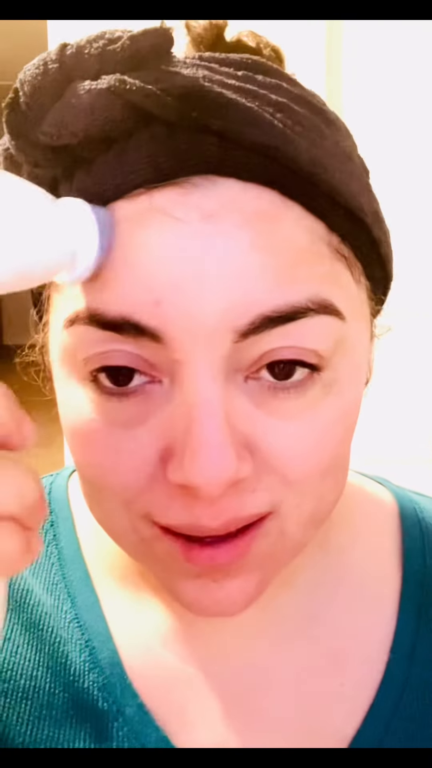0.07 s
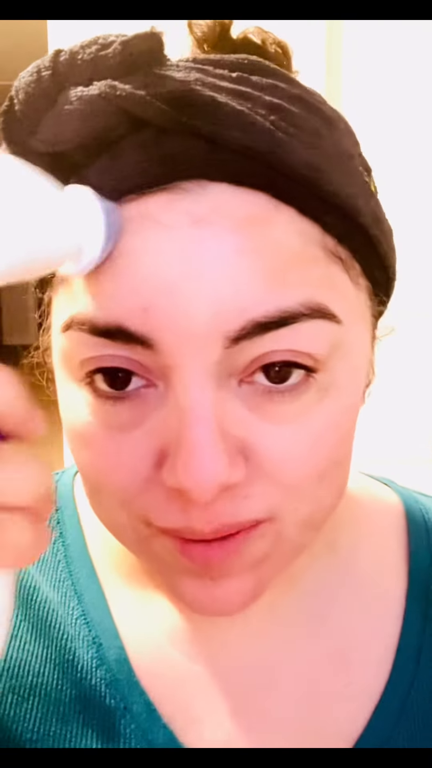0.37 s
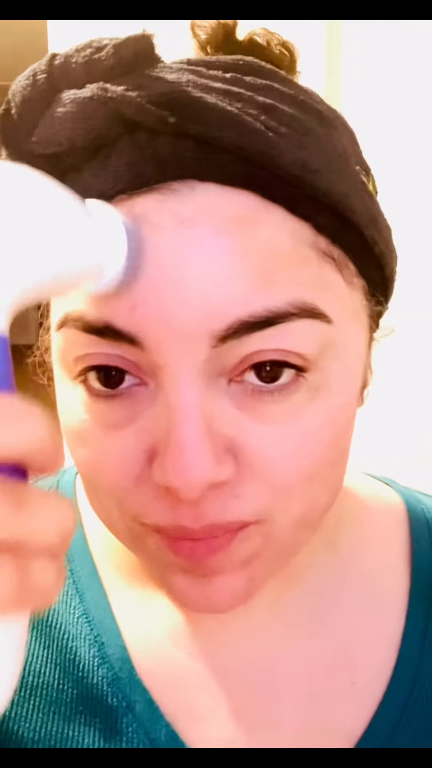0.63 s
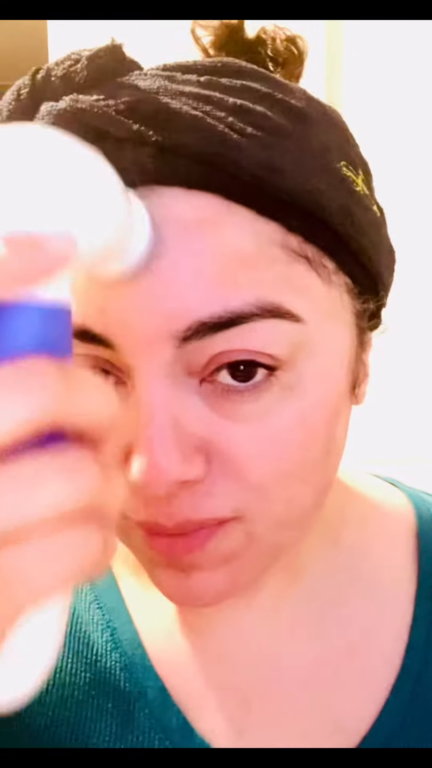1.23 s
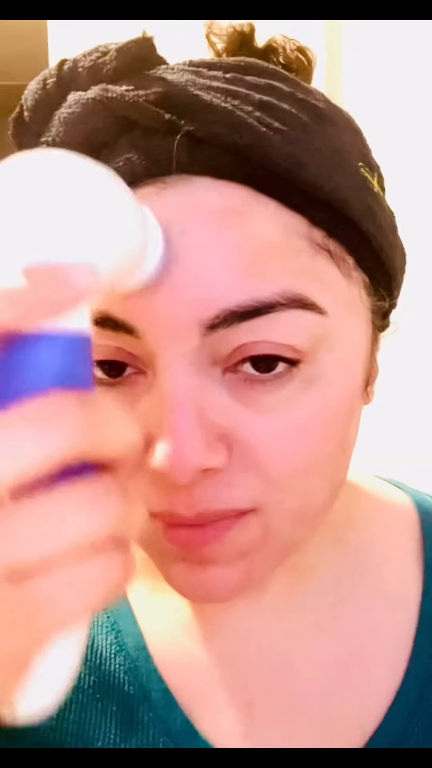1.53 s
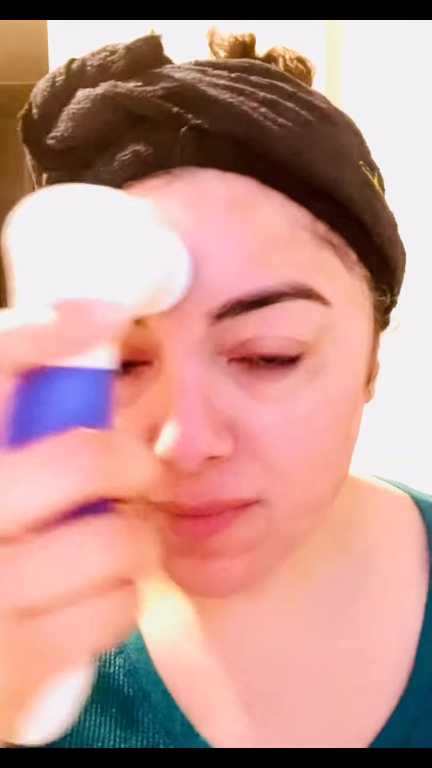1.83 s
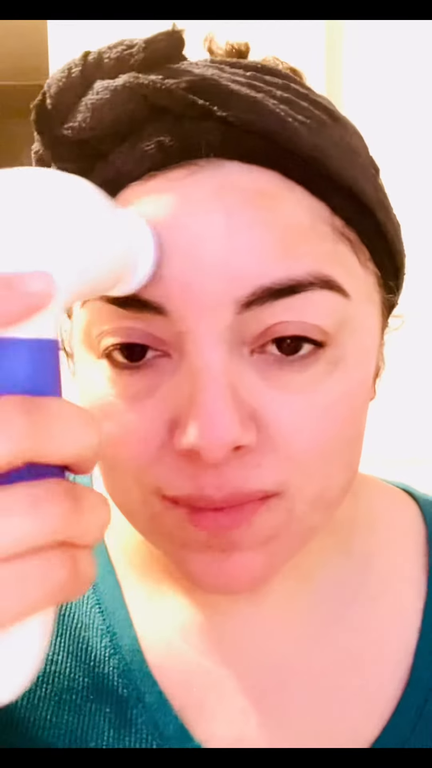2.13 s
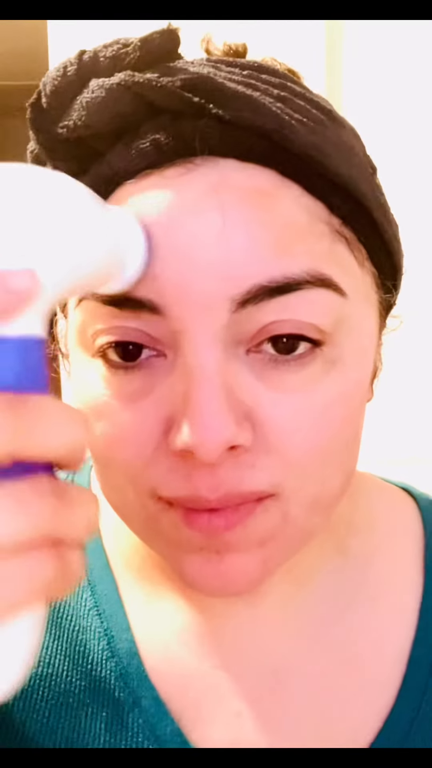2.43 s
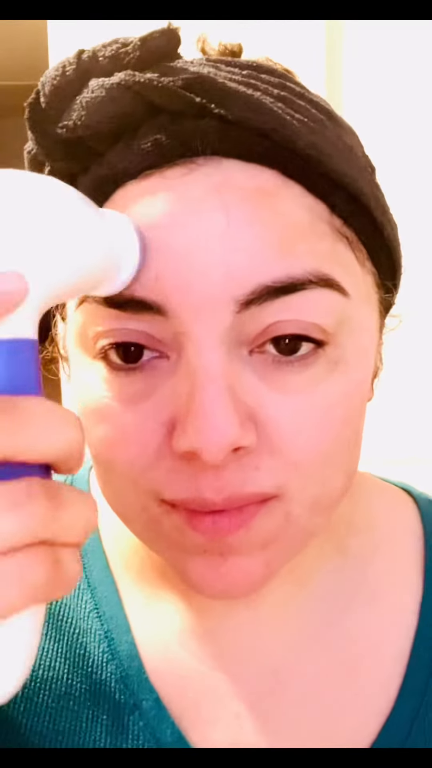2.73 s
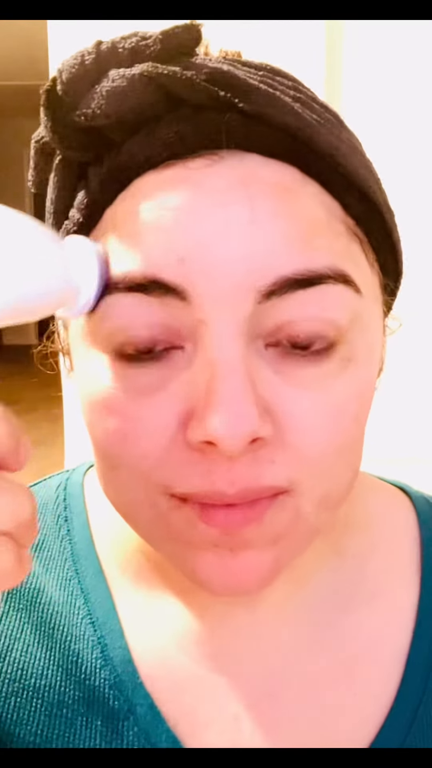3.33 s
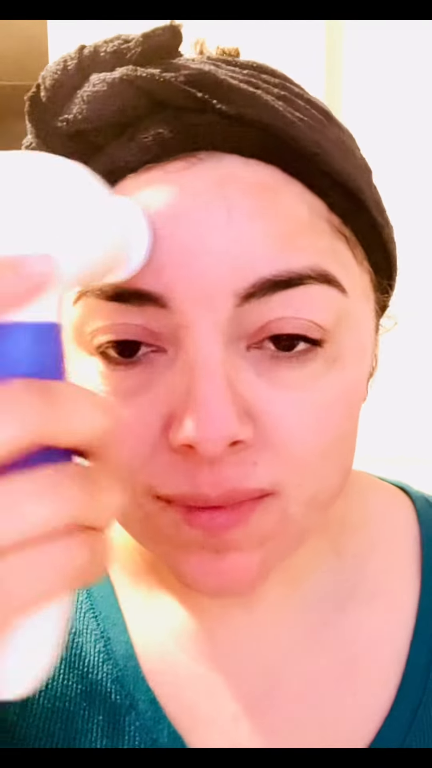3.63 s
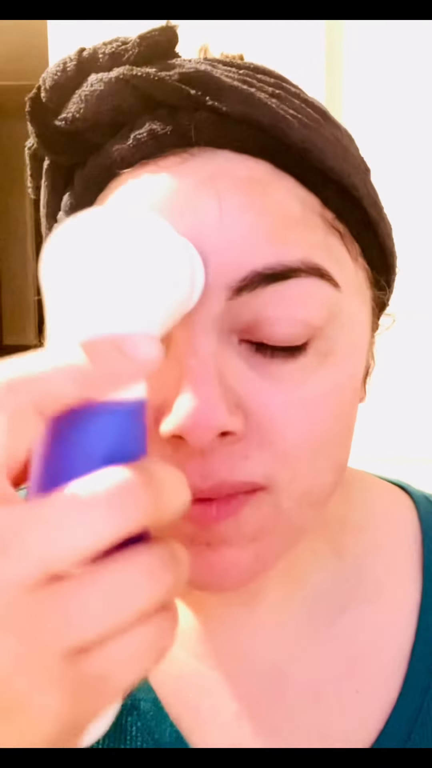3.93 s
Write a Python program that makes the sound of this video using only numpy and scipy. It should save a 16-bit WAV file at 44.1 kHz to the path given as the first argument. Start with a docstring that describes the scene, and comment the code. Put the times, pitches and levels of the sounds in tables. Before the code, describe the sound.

A small battery facial massager buzzes without a break, close to the microphone in a quiet room. Its high whine wavers slightly and swells and fades over a fine plastic rattle and hiss.

```python
"""A quiet room, close to a stereo microphone: a small battery facial massager buzzes over a forehead.
Its motor drives a wheel through a pinion: the teeth whine and rattle in the plastic housing, and the
brushes hiss once a turn. Pressure on the skin drags the speed down, and the whine swells and fades
as the hand turns. Underneath lie a soft rub of skin and the faint hum of the room."""
import sys
import numpy as np
from scipy import signal
from scipy.fft import rfft, irfft, next_fast_len
from scipy.io import wavfile
from scipy.ndimage import uniform_filter1d, map_coordinates

SR = 44100
rng = np.random.default_rng(int(sys.argv[2]) if len(sys.argv) > 2 else 0)


def wrap_up_sound(samples):
    """Save the sound to the file named by the first command line argument, as 16-bit audio."""
    columns = np.atleast_2d(samples).T
    # keep every value between -1 and 1, then stretch to whole-number steps
    tamed = np.clip(columns, -1, 1)
    steps = np.round(tamed * 32767).astype(np.int16)
    wavfile.write(sys.argv[1], SR, steps)


N = 176400

# The motor sagging under pressure. Each row: time in seconds, turns per second.
MOTOR_SPEED = [(0.0, 123.0), (0.06, 121.9), (0.18, 125.6), (0.36, 123.8), (0.42, 120.9), (0.6, 124.9),
               (0.68, 122.1), (0.76, 123.7), (0.84, 121.9), (0.88, 123.5), (1.1, 119.9), (1.16, 123.0),
               (1.24, 122.7), (1.32, 118.8), (1.38, 119.4), (1.46, 123.2), (1.52, 123.8), (1.74, 119.4),
               (1.82, 122.9), (1.94, 121.3), (2.02, 122.2), (2.18, 122.3), (2.26, 120.7), (2.34, 123.8),
               (2.46, 121.4), (2.68, 122.6), (2.78, 119.8), (2.86, 122.8), (2.94, 120.1), (3.02, 120.6),
               (3.06, 122.8), (3.34, 126.3), (3.58, 124.6), (3.68, 121.4), (3.76, 122.8), (3.99, 122.5)]
def massager():
    """Every part of the drive follows one motor shaft, so all the pitches bend together."""
    speed, = curves(MOTOR_SPEED)
    angle = 2 * np.pi * np.cumsum(uniform_filter1d(speed, size=1500)) / SR
    noise = ride_noise(rattle(angle) + brushes(angle))
    return noise + whine(angle) + motor_hum(angle) + shaft_tones(angle) + rasp(angle)


# Fader rides for the whines at 2, 3 and 4 times the tooth rate.
# Each row: time in seconds, level in dB before the trim.
LOW_WHINE_RIDE = [(0.02, -44), (.08, -50.5), (.14, -37.5), (.22, -43), (.35, -39), (.42, -49), (.56, -38),
                  (.67, -41.5), (.75, -43), (.82, -46.5), (.88, -40.5), (.97, -49), (1.03, -44),
                  (1.09, -46), (1.2, -45), (1.33, -52.5), (1.39, -45), (1.53, -42.5), (1.65, -49.5),
                  (1.92, -46.5), (1.99, -42.5), (2.06, -47.5), (2.14, -42), (2.27, -47.5), (2.35, -40),
                  (2.41, -45.5), (2.7, -44.5), (2.78, -61), (2.85, -46), (2.94, -58), (3.18, -47),
                  (3.22, -50.5), (3.26, -46.5), (3.34, -49.5), (3.38, -53), (3.52, -40.5), (3.6, -38.5),
                  (3.65, -48.5), (3.7, -43.5), (3.94, -44), (3.99, -52)]
HIGH_WHINE_RIDE = [(0.0, -38), (.1, -39), (.21, -48.5), (.36, -37), (.43, -43), (.51, -39.5), (.56, -47.5),
                   (.63, -40), (.8, -44), (.85, -47.5), (.92, -42.5), (1.11, -50.5), (1.2, -41.5),
                   (1.29, -47.5), (1.38, -45.5), (1.44, -51), (1.52, -44), (1.65, -51.5), (1.73, -44),
                   (1.86, -58), (2.0, -42), (2.08, -44), (2.36, -43), (2.6, -42), (2.98, -42.5),
                   (3.03, -49), (3.1, -41), (3.25, -51), (3.38, -76), (3.46, -47), (3.58, -39.5),
                   (3.78, -51), (3.99, -51.5)]
WHISTLE_RIDE = [(.2, -70), (.4, -57), (.6, -70), (1.3, -72), (1.48, -60.5), (1.85, -64), (2.05, -70),
                (2.75, -67), (2.95, -58), (3.1, -63), (3.3, -74), (3.85, -60)]
# The turning shell beams the high whine unevenly.
# Each row: time in seconds, left gain in dB, left lag in radians.
WHINE_BEAM = [(0, -2, -0.082), (.55, -0.5, 0.29), (.92, 0, 1), (1.08, 0, 1), (1.55, 0.5, 0.63),
              (2.05, 1.5, -0.42), (2.22, 0, -0.54), (2.36, 2, 0.16), (2.5, 0, -0.54), (2.85, -1, -0.46),
              (3.05, -14, 0.1), (3.55, -5, -0.026), (3.72, 3, -0.64), (3.9, 7.5, 0.67)]
WHINE_TRIM_DB, FLUTTER_DB, THROB_DEPTH = 1.52, 1.1, 0.47
PINION_TEETH, WHEEL_TEETH = 11, 27
def whine(angle):
    """Tooth-rate overtones sit on shell resonances; the off-centre pinion makes the top two throb."""
    low, high, thin = (amp(curves(ride)[0] + WHINE_TRIM_DB + FLUTTER_DB * wobble(45))
                       for ride in (LOW_WHINE_RIDE, HIGH_WHINE_RIDE, WHISTLE_RIDE))
    mesh = PINION_TEETH * angle + .02 * wobble(60)
    throb = 1 + THROB_DEPTH * np.cos(angle)
    left_db, left_lag = curves(WHINE_BEAM)
    beamed = np.array([amp(left_db) * np.cos(3 * mesh - left_lag), np.cos(3 * mesh)])
    whistle = np.cos(4 * mesh + .9 * wobble(200))  # phase jitter makes it husky
    return np.sqrt(2) * (low * np.cos(2 * mesh) + throb * (high * beamed + thin * whistle))


# The buzz of the motor and of the uneven wheel.
# Each entry: multiple of that shaft's turn, then level in dB, change at the temple in dB.
MOTOR_PARTIALS = {3: (-71, 0), 5: (-76, 0), 9: (-61.5, 6), 10: (-66, 1), 11: (-59.5, -3), 12: (-71, 6),
                  13: (-70, 0), 15: (-68, 0), 19: (-66, 0), 21: (-65, 0), 23: (-60, 0), 25: (-60, 0),
                  55: (-59, -4), 66: (-61, 0)}
WHEEL_PARTIALS = {11: (-75, 4), 53: (-64, 0), 55: (-61, 0), 56: (-57, 0), 57: (-61, 0), 58: (-63, 0),
                  62: (-65, 0), 76: (-63, 0), 77: (-58, 0), 79: (-51, 1), 80: (-61, 0), 84: (-58, 0),
                  90: (-63, 0), 92: (-64, 0), 95: (-66, 0)}
def shaft_tones(angle):
    """Both shafts sound wavering harmonics, smeared over each turn by the shell's dispersion."""
    turned = at_temple()
    wheel_angle = angle * PINION_TEETH / WHEEL_TEETH
    buzz = np.zeros(N)
    for shaft, partials, wander_db in (angle, MOTOR_PARTIALS, 2), (wheel_angle, WHEEL_PARTIALS, 2.5):
        for multiple, (db, temple_db) in partials.items():
            level = amp(db + temple_db * turned + wander_db * wobble(6.96))
            dispersion = 1.1 * multiple ** 2
            buzz += level * np.cos(multiple * shaft + dispersion)
    return np.sqrt(2) * buzz


# The plastic's colour on rattle and hiss. Each row: frequency in Hz, relative level in dB.
HOUSING_COLOUR = [(100, -25.5), (300, -22.5), (600, -27.5), (780, -10.5), (930, -20), (1250, -11),
                  (1800, -14.5), (2100, -16), (2450, -9), (2720, -4.5), (2950, -6), (3400, -11.5),
                  (3750, -9), (4050, 2.5), (4400, -12.5), (4800, -6), (5100, -13.5), (5400, -11.5),
                  (6100, -12.5), (6700, -6.5), (7400, -19), (8150, -5.5), (9000, -15), (10500, -16.5),
                  (12000, -15), (13000, -20.5), (14000, -32.5)]
RATTLE_DB = -54
def rattle(angle):
    """One blow per tooth rings the housing; every tooth of pinion and wheel has its own error."""
    teeth_passed = angle * PINION_TEETH / (2 * np.pi)
    tooth = np.arange(1, int(teeth_passed[-1]))
    pinion_error = rng.standard_normal(PINION_TEETH)[tooth % PINION_TEETH]
    wheel_error = rng.standard_normal(WHEEL_TEETH)[tooth % WHEEL_TEETH]
    force = .6 * (pinion_error + wheel_error) + .25 * rng.standard_normal(N)[tooth]
    onsets = np.rint(np.interp(tooth, teeth_passed, np.arange(N))).astype(int)
    return amp(RATTLE_DB) * ring(np.bincount(onsets, force, N), HOUSING_COLOUR)


# Bright hiss that faces the microphone at the temple. Each row: frequency in Hz, relative level in dB.
SHEEN_COLOUR = [(100, -63), (7000, -4), (8800, 1.5), (9600, -0.5), (10200, -2), (11000, -60), (14000, -50)]
HISS_DB, SHEEN_DB, PUFF_SWING_DB = -46.5, -49, 1.5
SPARKS_PER_S, SPARK_DB, SPARK_SPREAD_DB = 290, -58, 3.5
def brushes(angle):
    """Sliding contacts hiss in a puff each turn and spit tiny sparks."""
    puff = amp(PUFF_SWING_DB * np.cos(angle) + 1.33 * wobble(150))
    hiss = unit(puff * stereo_noise(HOUSING_COLOUR, DEVICE_CORRELATION))
    fires = rng.random(N) < SPARKS_PER_S / SR * puff
    strength = amp(SPARK_SPREAD_DB * np.clip(rng.standard_normal(N), -2, 2))
    spark_colour = [(2000, -5), (6000, 7), (9000, 14.5), (12000, 11.5), (14000, -44)]
    sparks = filtered(fires * strength, lambda hz: amp(along(spark_colour, hz)))
    sheen = at_temple() * puff * stereo_noise(SHEEN_COLOUR, DEVICE_CORRELATION)
    return amp(HISS_DB) * hiss + amp(SPARK_DB) * unit(sparks) + amp(SHEEN_DB) * sheen


# A two-band ride on rattle and hiss. Each row: time in seconds, body gain in dB, treble gain in dB.
NOISE_RIDE = [(0, 2.5, -1.5), (.2, 1, 2.5), (.45, 1.5, 2), (1, 0, 1), (1.55, -1, 1), (2, 0.5, 1.5),
              (2.7, 0, 0.5), (2.9, 0, 2.5), (3.2, -0.5, 0.5), (3.45, 1.5, 2.5), (3.7, -1, 0.5),
              (4, -1, 3.5)]
# Brief surges and one dip in the treble. Each row: centre in seconds, gain in dB.
TREBLE_SURGES = [(.58, 0.5), (.86, 2), (1.47, 5), (1.58, 3.5), (2.02, 0.5), (2.2, 2), (2.93, -5), (3.79, 3)]
CROSSOVER_HZ, SURGE_HALF_WIDTH_S = 7400, 0.037
def ride_noise(noise):
    """The rattle and hiss flicker, and their body and treble swell separately."""
    noise = noise * amp(1.17 * wobble(12))
    treble = filtered(noise, lambda hz: 1 - 1 / (1 + (hz / CROSSOVER_HZ) ** 6))
    body_db, treble_db = curves(NOISE_RIDE)
    surge_db = sum(db * bump(centre, SURGE_HALF_WIDTH_S) for centre, db in TREBLE_SURGES)
    return amp(body_db) * (noise - treble) + amp(treble_db + surge_db) * treble


# The rasp, strongest on the way to the temple. Each row: time in seconds, level in dB.
RASP_RIDE = [(.55, -54), (.9, -53), (2.8, -64), (2.95, -48), (3.05, -57), (3.58, -64), (3.7, -72)]
RASP_HZ, RASP_HALF_WIDTH_HZ = 4500, 260
def rasp(angle):
    """A shell resonance just above the high whine rasps once a motor turn."""
    noise = rng.standard_normal(N)
    band = filtered(noise, lambda hz: 1 / (1 + ((hz - RASP_HZ) / RASP_HALF_WIDTH_HZ) ** 4))
    puff = amp(PUFF_SWING_DB * np.cos(angle))
    return amp(curves(RASP_RIDE)[0]) * unit(band * puff)


# The motor's low note. Each row: time in seconds, level in dB.
HUM_RIDE = [(0, -73), (.25, -62), (.45, -71.5), (.7, -64), (1.8, -62.5), (2.1, -66.5), (2.7, -65.5),
            (3, -76), (3.6, -62), (4, -60)]
def motor_hum(angle):
    """A tone at four times the motor's turn swells as the device comes round to the front."""
    return np.sqrt(2) * amp(curves(HUM_RIDE)[0]) * np.cos(4 * angle)


# Sharp little accents. Each row: start in seconds, peak in dB before the trim.
TICK_CUES = [(2.0193, -41), (2.1181, -42), (3.2464, -50), (3.6366, -41), (3.7359, -37.5), (3.7848, -38),
             (3.8831, -38.5), (3.932, -38), (3.9844, -45)]
TICK_HZ, TICK_T60_S, TICK_TRIM_DB = 11700, 0.0074, 3.5
def brush_ticks():
    """Now and then a brush catches with a short, high tick."""
    t = np.arange(SR // 100) / SR
    track = np.zeros(N + len(t))
    for start, db in TICK_CUES:
        phase = 2 * np.pi * TICK_HZ * t + np.cumsum(0.24 * rng.standard_normal(len(t)))
        envelope = amp(db + TICK_TRIM_DB - 60 * t / TICK_T60_S)
        track[round(start * SR):][:len(t)] += envelope * np.sin(phase)
    return track[:N]


# The dull colour of skin friction. Each row: frequency in Hz, relative level in dB.
SKIN_COLOUR = [(60, -30), (180, -3), (250, -2), (350, -3.5), (600, -6), (2000, -40)]
RUB_DB = -61.5
def skin_rub():
    """The massager's head rubs softly on the skin during its firmest stroke."""
    stroke = bump(centre_s=0.79, half_width_s=0.31)
    return amp(RUB_DB) * stroke * stereo_noise(SKIN_COLOUR, DEVICE_CORRELATION)


# Swings round to the temple. Each row: centre in seconds, half width in seconds.
TEMPLE_TURNS = [(0.214, 0.099), (3.265, 0.2)]
def at_temple():
    """How far the hand has turned: 0 on the forehead, 1 at the temple."""
    return sum(bump(centre, half_width) for centre, half_width in TEMPLE_TURNS)


# The device's pan. Each row: frequency in Hz, left minus right in dB.
PAN = [(120, -13), (480, -27), (800, 1.5), (1120, -10), (1380, -2.5), (2000, 1), (2700, -8.5), (3100, -4.5),
       (3600, -1.5), (3920, -7), (4060, -0.5), (4550, -4), (5400, -1), (8000, -1), (12000, 0)]
# Its arrival at the two sides. Each row: frequency in Hz, left phase lead in radians.
LEFT_LEAD = [(120, 0), (860, -.8), (1380, -.4), (2100, -2.7), (2650, -4.6), (3300, -3.8), (4000, -4.15),
             (5000, -5.4), (5600, -6.1), (6550, -3.4), (8600, -2.8), (10000, -1.2), (10500, -.1),
             (13000, 0)]
def microphone_ports(hz):
    """The device is nearer the right port: mostly louder and earlier there."""
    sides = np.array([[.5], [-.5]])
    gain = amp(sides * along(PAN, hz))
    phase = sides * along(LEFT_LEAD, hz)
    return gain / np.sqrt(np.mean(gain ** 2, axis=0)) * np.exp(1j * phase)


# Stereo focus of the device's noise. Each row: frequency in Hz, left-right correlation (1 is mono).
DEVICE_CORRELATION = [(200, 0.51), (1000, 0.54), (6200, 0.11), (7200, 0.79), (10000, 1), (11000, 0.88)]
def stereo_noise(colour, correlation):
    """Coloured noise of rms 1, its width set by the balance of mid and side."""
    def mid_side(hz):
        width = np.arccos(np.clip(along(correlation, hz), -1, 1)) / 2
        return amp(along(colour, hz)) * [np.cos(width), np.sin(width)]
    mid, side = filtered(rng.standard_normal((2, N)), mid_side)
    return unit(np.array([mid + side, mid - side]))


ROOM_T60_S, ROOM_SEND_DB = .18, -17.5
def reflections(device):
    """A short, weak answer from the walls, dull at the top; its paths shift as the hand moves."""
    t = np.arange(SR // 3) / SR
    tails = rng.standard_normal((3, 2, len(t))) * amp(-60 * t / ROOM_T60_S)
    wet = sum(wobble(6) * signal.fftconvolve(device, tail, axes=1)[:, :N] for tail in tails)
    wet /= np.linalg.norm(tails[:, 0])
    return amp(ROOM_SEND_DB) * filtered(wet, lambda hz: 1 / (1 + (hz / 8000) ** 4))


# The bed of air. Each row: frequency in Hz, relative level in dB.
AIR_COLOUR = [(15, -21), (30, -18), (45, -3.5), (65, 0.5), (90, -8.5), (140, -6), (200, -10.5), (300, -11),
              (600, -13.5), (2000, -51), (10000, -46)]
# Steady hums. Each row: frequency in Hz, level in dB, end in seconds.
ROOM_HUMS = [(157.7, -66.5, 1.66), (120.6, -72.5, 4.2)]
# Swells of the drone. Each row: start in seconds, end in seconds, level in dB.
DRONE_SWELLS = [(1.44, 1.727, -54.5), (2.08, 2.693, -60), (3.02, 3.327, -58.5)]
AIR_DB, DRONE_HZ, DRONE_DRIFT_HZ, FADE_S = -62.5, 45.8, 1.3, 0.17
def room_tone():
    """Air, two faint hums and a deep drone that comes and goes, all leaning to the right."""
    t = np.arange(N) / SR
    fade = lambda s: np.clip(s / FADE_S + .5, 0, 1)
    hums = sum(amp(db) * fade(end - t) * np.sin(2 * np.pi * hz * t) for hz, db, end in ROOM_HUMS)
    swell = sum(amp(db) * fade(t - start) * fade(end - t) for start, end, db in DRONE_SWELLS)
    drone_hz = DRONE_HZ + DRONE_DRIFT_HZ * wobble(7.77)
    drone = swell * np.sin(2 * np.pi * np.cumsum(drone_hz) / SR)
    air = amp(AIR_DB) * stereo_noise(AIR_COLOUR, correlation=[(40, 1.0), (120, 0.34), (500, 0.64)])
    return (air + np.sqrt(2) * (hums + drone)) * amp([[-1.6], [1.6]])


def amp(db):
    """Decibels to gain."""
    return 10 ** (np.asarray(db) / 20)


def unit(x):
    """Scaled to rms 1."""
    return x / np.sqrt(np.mean(x ** 2) + 1e-20)


def along(points, hz):
    """Reads (Hz, value) points on a log frequency axis."""
    freqs, values = np.transpose(points)
    return np.interp(np.log(hz + 1), np.log(freqs + 1), values)


def curves(rows):
    """One value per sample for each column after the time."""
    times, *columns = np.transpose(rows)
    return [np.interp(np.arange(N) / SR, times, column) for column in columns]


def bump(centre_s, half_width_s):
    """A bell-shaped swell that peaks at 1."""
    return np.exp(-((np.arange(N) / SR - centre_s) / half_width_s) ** 2)


def wobble(rate):
    """A smooth random curve, rate knots a second."""
    return map_coordinates(rng.standard_normal(int(N * rate / SR) + 4), [np.arange(N) * rate / SR])


def filtered(x, response):
    """x through a complex response of frequency."""
    size = next_fast_len(N + SR // 2)
    return irfft(rfft(x, size) * response(np.fft.rfftfreq(size, 1 / SR)), size)[..., :N]


def ring(blows, colour, size=4096):
    """Blows ring a body of this colour: a minimum-phase filter, its output at rms 1."""
    cepstrum = irfft(np.log(amp(along(colour, np.fft.rfftfreq(size, 1 / SR)))))
    cepstrum[1:size // 2] *= 2
    cepstrum[size // 2 + 1:] = 0
    impulse_response = irfft(np.exp(rfft(cepstrum)))
    return unit(signal.fftconvolve(blows, impulse_response)[:N])


def scene():
    """The massager close by, in its room."""
    device = massager() + skin_rub() + brush_ticks()
    return filtered(device, microphone_ports) + reflections(device) + room_tone()


BAND_LIMIT_HZ = 13900
def record(dry):
    """A brick-wall cut takes off the very top."""
    return filtered(dry, lambda hz: hz < BAND_LIMIT_HZ)


dry = scene()
out = record(dry)
wrap_up_sound(out)
```